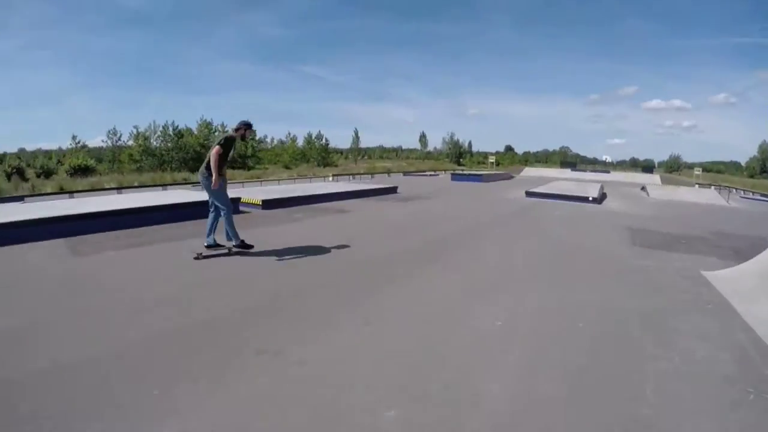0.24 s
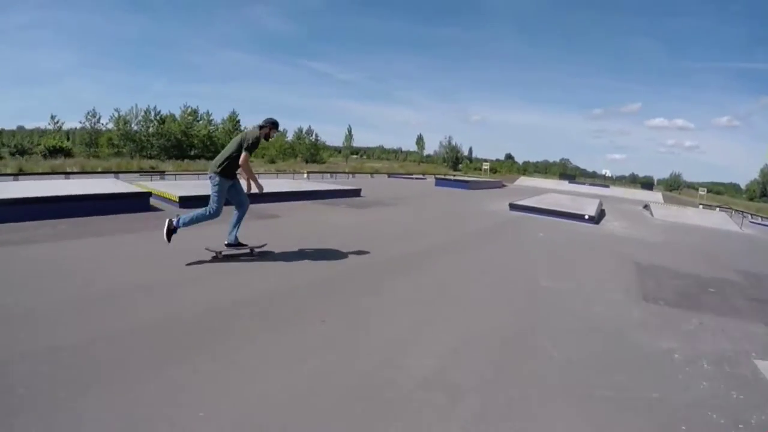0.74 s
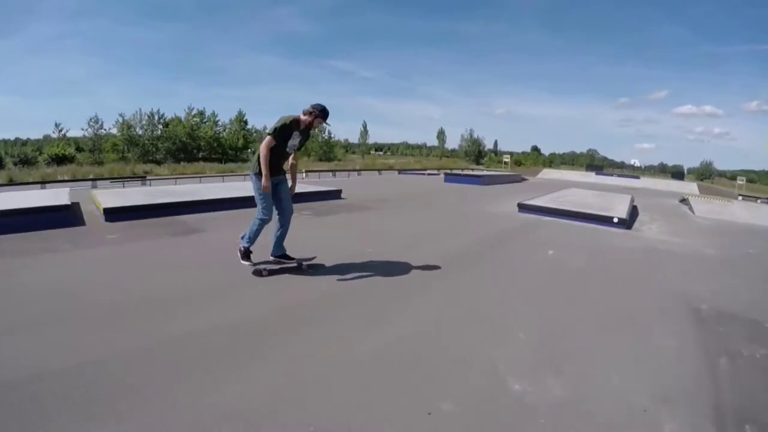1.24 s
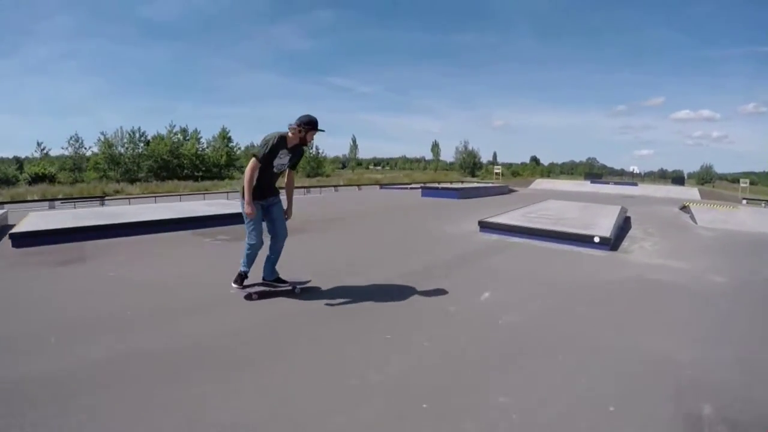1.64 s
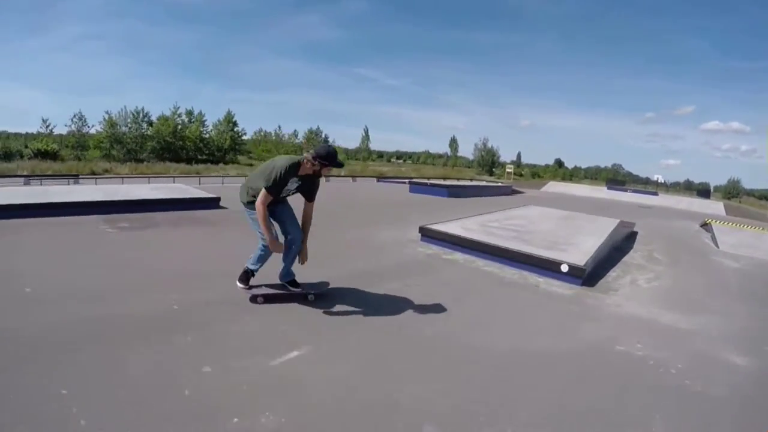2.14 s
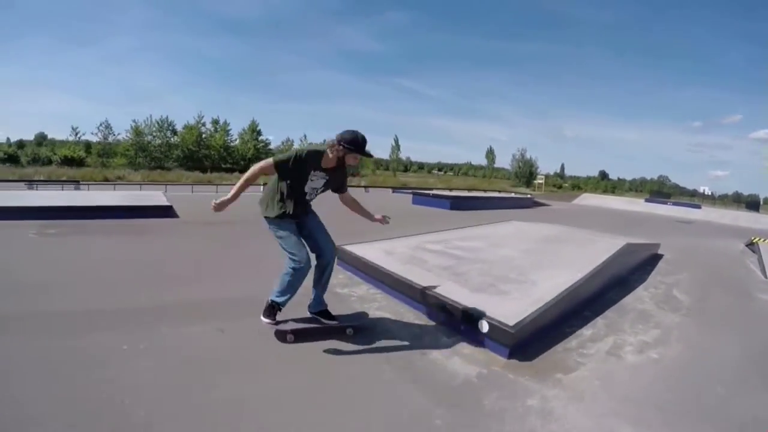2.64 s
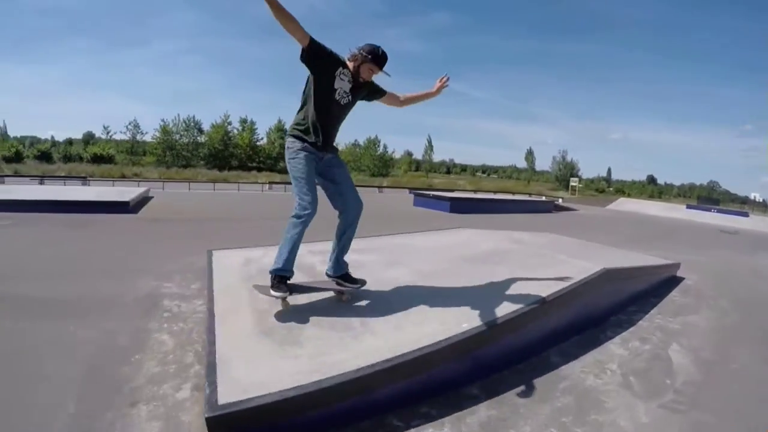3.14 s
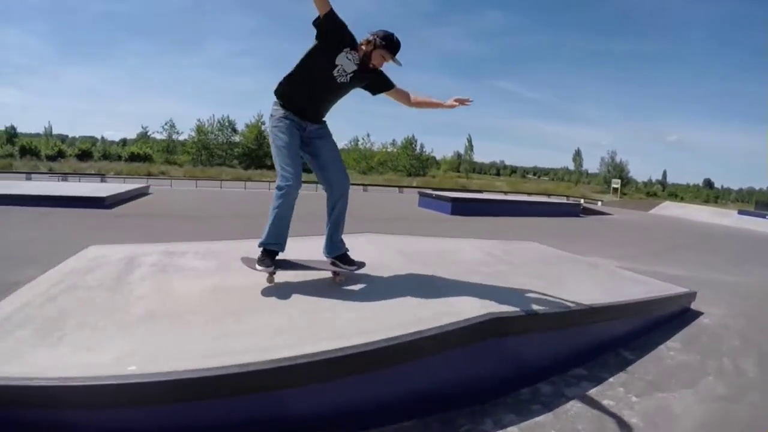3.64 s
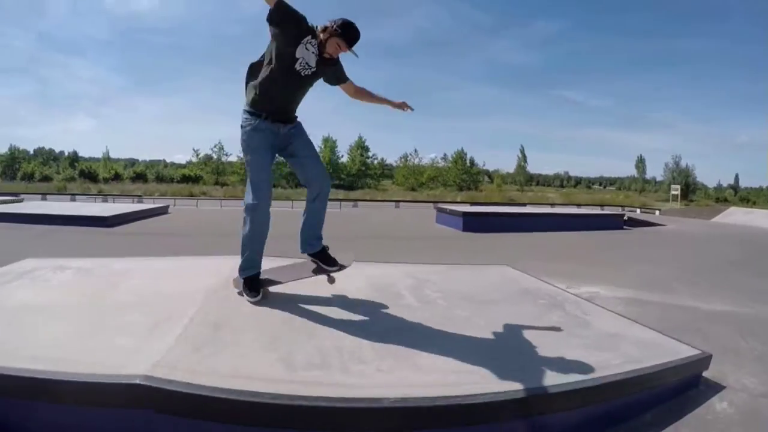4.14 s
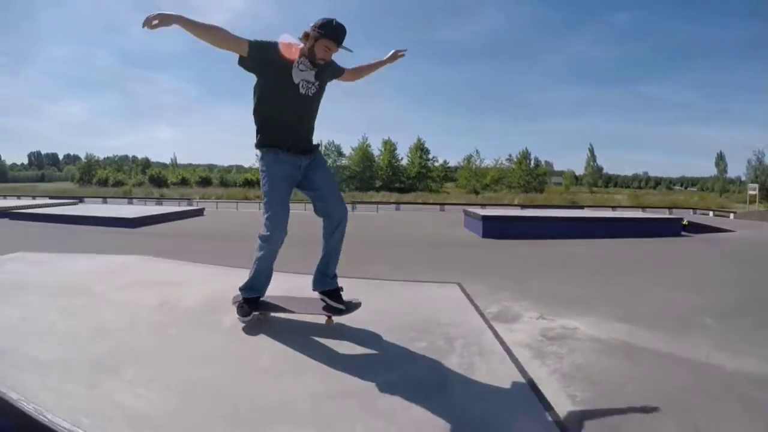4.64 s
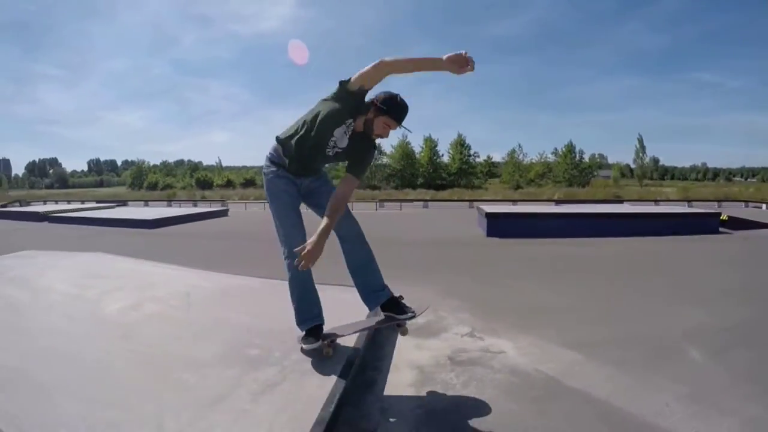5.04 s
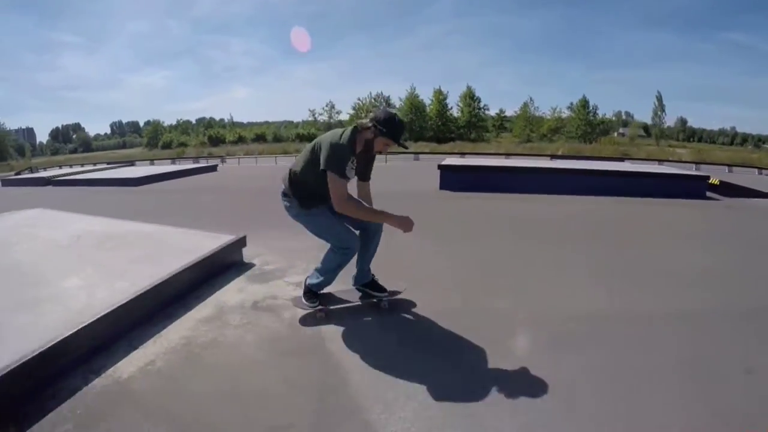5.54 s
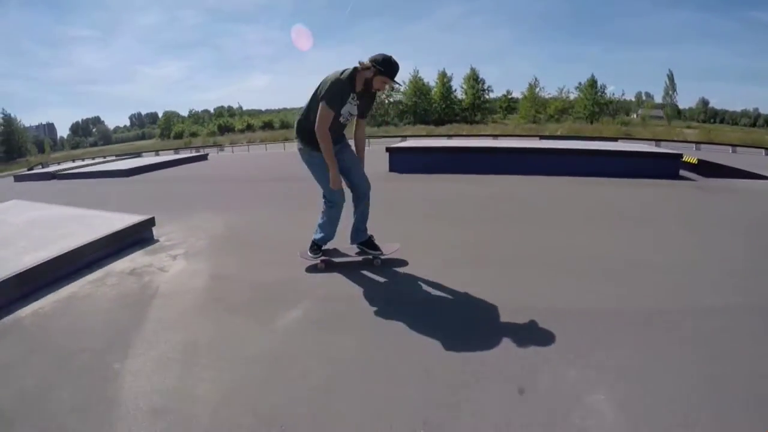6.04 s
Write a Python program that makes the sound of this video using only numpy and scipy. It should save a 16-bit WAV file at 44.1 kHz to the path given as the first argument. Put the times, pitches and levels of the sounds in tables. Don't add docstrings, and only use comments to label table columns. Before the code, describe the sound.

Outdoors in a concrete skatepark, a microphone inside a hard plastic shell catches a rolling skateboard. Irregular hard knocks, chatter and scrapes crowd close over low rumble, wind flutter and faint wheel grind. Dull thuds come through the mount. A quick, bouncing wooden slap marks the drop from a low platform, then the rattle thins out and a smooth rubbing wash closes.

```python
import sys
import numpy as np
from scipy import signal
from scipy.fft import rfft, irfft
from scipy.io import wavfile

SR = 44100
rng = np.random.default_rng(int(sys.argv[2]) if len(sys.argv) > 2 else 0)


def amplitude_ratio(level_db):
    exponent = np.asarray(level_db, float) / 20
    return 10 ** exponent


def pcm_store(signal):
    levels = np.round(np.clip(np.atleast_2d(signal), -1, 1) * 32767)
    wavfile.write(sys.argv[1], SR, levels.astype(np.int16).T)


N = 277830


def noise():
    return rng.standard_normal(N)


def rms_one(x):
    return x / np.sqrt(np.mean(x ** 2) + 1e-20)


def colour(x, spectrum):
    hz = np.linspace(1, SR / 2, 4097)
    table = np.array(spectrum)
    level_db = np.interp(np.log(hz), np.log(table[:, 0]), table[:, 1])
    cepstrum = irfft(np.log(amplitude_ratio(level_db)))
    cepstrum[1:4096] *= 2
    cepstrum[4097:] = 0
    response = irfft(np.exp(rfft(cepstrum)))
    return signal.fftconvolve(x, response / np.linalg.norm(response))[:N]


def drift(rate):
    r = np.exp(-2 * np.pi * rate / SR)
    slow = signal.lfilter([1], [1, -2 * r, r * r], rng.standard_normal(N + SR))
    return rms_one(slow[SR:])


def ring(force, hz, t60):
    r = amplitude_ratio(-60 / (t60 * SR))
    w = 2 * np.pi * hz / SR
    return signal.lfilter([0, np.sin(w)], [1, -2 * r * np.cos(w), r * r], force + 1e-18)


def bursts(times, strengths, shapes):
    out = np.zeros(N + shapes.shape[1])
    for s, strength, shape in zip(times, strengths, shapes):
        at = round(s * SR)
        out[at:at + len(shape)] += strength * shape
    return out[:N]


def swells(starts, lengths, gains, edge):
    out = np.zeros((gains.shape[1], N + SR))
    for s, length, gain in zip(starts, lengths, gains):
        at = round(s * SR)
        swell = signal.windows.tukey(round(length * SR), edge)
        out[:, at:at + len(swell)] += np.outer(gain, swell)
    return out[:, :N]


def in_time(rows):
    s, *columns = np.transpose(rows)
    return [np.interp(np.arange(N) / SR, s, c) for c in columns]


# (frequency [Hz], level [dB per Hz])
WIND = [(15, -6), (28, 6.5), (60, -1), (100, -10.5), (160, -36), (300, -61), (2000, -65)]


def wind(gust_db):
    return amplitude_ratio(gust_db - 0.74 + 3.2 * drift(7.5)) * colour(noise(), WIND)


# (frequency [Hz], level [dB per Hz])
RUMBLE = [(40, -20.5), (80, 4.5), (150, 2.5), (250, -8), (400, -20), (600, -24), (1000, -72.5)]


def rumble(gust_db, rough):
    level_db = -23 + 0.57 * gust_db + 2.0 * drift(11.7) + 1.8 * rough
    return amplitude_ratio(level_db) * colour(noise(), RUMBLE)


# (frequency [Hz], level [dB per Hz])
WHEELS = [(450, -48), (600, -12), (790, 2), (1190, 1.5), (1760, 5), (2910, -3.5), (3340, -12),
          (4500, -28.5)]


def wheel_noise(wheels_db, rough):
    level_db = wheels_db - 7.5 + 1.95 * rough + 2.3 * drift(130)
    return amplitude_ratio(level_db) * colour(noise(), WHEELS)


# (frequency [Hz], level [dB per Hz])
BEARINGS = [(3000, -11.5), (3600, 2.5), (4200, -4.5), (4600, -4.5), (5100, -17), (6500, -31)]


def bearing_rush(bearings_db, rough):
    level_db = bearings_db - 7.0 + 0.94 * rough + 1.5 * drift(9.0)
    return amplitude_ratio(level_db) * colour(noise(), BEARINGS)


# (frequency [Hz], level [dB per Hz])
HISS = [(3500, -2), (5000, 9), (6400, 11), (8300, -2), (10000, 2), (12500, -1), (15000, -10), (16400, -22)]


def wheel_hiss(hiss_db, rough):
    level_db = hiss_db + 0.74 * rough + 0.64 * drift(2.1)
    return amplitude_ratio(level_db) * colour(noise(), HISS)


# (time [s], level [dB])
GUSTS = [(0.0, -29.5), (0.07, -28.5), (0.35, -38), (0.49, -31), (0.77, -36.5), (2.68, -35), (2.86, -32.5),
         (2.96, -40), (3.75, -30), (4.0, -32), (4.9, -31.5), (5.39, -35), (5.44, -28.5), (5.63, -34.5),
         (5.77, -33.5), (5.96, -29.5), (6.19, -46), (6.3, -30)]
# (time [s], wheel noise [dB], bearing rush [dB], hiss [dB])
RIDE = [(0.0, -39.5, -43, -57), (.3, -43, -51, -76), (1.05, -43, -52, -75), (1.5, -44.5, -50, -76),
        (2.05, -47.5, -54.5, -80), (2.7, -45, -50.5, -72), (3.05, -49, -53.5, -78), (3.4, -43, -57, -76),
        (3.7, -49.5, -50, -76), (4.1, -44, -50.5, -81), (4.45, -45.5, -53.5, -76), (4.85, -44.5, -49, -70),
        (5.2, -47.5, -54, -74), (5.5, -44.5, -48, -66), (6.0, -47.5, -55.5, -76), (6.3, -51, -56.5, -76)]


def rolling():
    [gust_db] = in_time(GUSTS)
    wheels_db, bearings_db, hiss_db = in_time(RIDE)
    rough = drift(37)
    ground = rumble(gust_db, rough) + wheel_noise(wheels_db, rough)
    return wind(gust_db) + ground + bearing_rush(bearings_db, rough) + wheel_hiss(hiss_db, rough)


# (start [s], length [s], level [dB], centre [Hz], width [Hz])
WHINES = [
    (1.42, 0.17, -72, 6000, 900),
    (1.44, .2, -60, 4100, 900),
    (4.68, .25, -60, 4000, 800),
    (2.62, .3, -72, 8000, 1200),
    (4.3, .12, -80, 6990, 502),
    (4.619, 0.29, -67, 5480, 700),
    (4.72, 0.2, -68, 8200, 1798),
    (5.02, 0.25, -72.5, 7800, 1800),
    (5.4, 0.24, -72, 8000, 1800),
]


def whines():
    out = np.zeros(N)
    for s, length, db, hz, width in WHINES:
        band = signal.butter(2, [hz - width / 2, hz + width / 2], "band", fs=SR, output="sos")
        song = rms_one(signal.sosfilt(band, noise()))
        out += swells([s], [length], amplitude_ratio([[db]]), edge=0.7)[0] * song
    return out * amplitude_ratio(2.5 * drift(25))


SAND_S = [1.616, 3.841, 3.861, 4.229, 4.241, 4.33, 4.343, 4.387, 4.465, 4.482, 4.52, 4.535, 4.76, 5.01,
          5.049, 5.43, 5.448, 5.463, 5.6, 5.612, 5.745, 5.79]
# (frequency [Hz], level [dB per Hz])
SAND = [(4000, -30), (6500, 0), (12000, 2), (15500, -4), (16500, -30)]


def sand():
    clear_db, stray_db, strays_per_s = -60, -70, 29
    stray_s = rng.uniform(0, N / SR, round(strays_per_s * N / SR))
    s = np.concatenate([SAND_S, stray_s])
    level_db = np.where(np.arange(len(s)) < len(SAND_S), clear_db, stray_db)
    level_db = level_db + 3 * rng.standard_normal(len(s))
    t = np.arange(200) / SR
    grains = rng.standard_normal((len(s), len(t))) * np.exp(-t / 0.0012)
    return colour(bursts(s, amplitude_ratio(level_db), grains), SAND)


def cable_tug():
    recovery = np.exp(-np.arange(800)[None] / SR / 0.003)
    return bursts([4.0992], [-amplitude_ratio(-31)], recovery)


# (time [s], peak level [dB], pitch [Hz])
THUDS = [(0.725, -26, 177), (0.908, -32.5, 184), (1.486, -32, 122), (1.717, -29, 167), (2.437, -29, 119),
         (2.919, -26, 144), (3.066, -32.5, 272), (3.727, -25, 160), (5.327, -28.5, 226.8),
         (4.131, -31.5, 204), (6.051, -30.5, 177), (.146, -36.5, 297), (1.493, -36, 330),
         (1.845, -44.5, 377), (3.275, -38.5, 335), (3.487, -42, 330), (3.734, -38.5, 330),
         (5.701, -36, 330), (6.056, -36, 380)]


def thuds():
    t60 = 0.061
    soft_push = signal.windows.hann(50)[None] / 25
    out = np.zeros(N)
    for s, db, hz in THUDS:
        for ratio, more_db in [(1, 4), (1.65, -12.5)]:
            out += ring(bursts([s], [amplitude_ratio(db + more_db)], soft_push), hz * ratio, t60 / ratio)
    return out


# (start [s], length [s], level [dB])
WASHES = [
    (0, 0.036, -34.5),
    (0.246, 0.033, -46.5),
    (0.347, 0.2, -59),
    (0.724, 0.062, -45.5),
    (0.8, 0.124, -53),
    (4.163, .013, -47),
    (5.932, 0.022, -50),
    (6.212, 1, -48),
]
# (frequency [Hz], level [dB per Hz])
WASH = [(3000, 0), (3700, 4.5), (4500, -5), (5200, -5), (8600, -9.5), (9800, -16.5), (12400, -10),
        (15400, -20), (16400, -45)]


def palm():
    s, length, level_db = np.transpose(WASHES)
    return swells(s, length, amplitude_ratio(level_db)[:, None], edge=0.077)[0] * colour(noise(), WASH)


# (time [s], blow level [dB])
LANDING = [
    (5.3212, -23),
    (5.3243, -26),
    (5.328, -16.5),
    (5.333, -30),
    (5.3366, -17.5),
    (5.339, -24),
    (5.342, -30),
    (5.346, -35),
]
# (pitch [Hz], level [dB], time to fall 60 dB [s])
DECK = [(330, -21, 0.022), (467, -22, .025), (1190, -1.5, 0.029), (1300, -7.5, 0.024), (2600, -16, 0.0092),
        (3950, -5, .008)]


def landing():
    s, blow_db = np.transpose(LANDING)
    luck = rng.standard_normal((len(s), len(DECK)))
    click = np.ones((len(s), 1))
    out = np.zeros(N)
    for k, (hz, db, t60) in enumerate(DECK):
        out += ring(bursts(s, amplitude_ratio(blow_db + db + 3 * luck[:, k]), click), hz, t60)
    return out


# (start [s], length [s], level [dB], centre [Hz])
CHATTER = [(0.0, 0.047, -34, 1620), (0.473, 0.058, -36.5, 2170), (0.557, 0.029, -37.5, 1910),
           (0.637, 0.077, -50.5, 1890), (0.912, 0.027, -36.5, 1740), (0.988, 0.026, -35.5, 1800),
           (1.055, 0.039, -37, 1700), (1.404, 0.032, -33, 1670), (1.342, .045, -50, 1300),
           (1.848, .04, -54, 1100), (1.627, 0.059, -43, 1990), (1.724, 0.045, -37.5, 2100),
           (1.897, 0.083, -45.5, 1930), (1.969, 0.089, -50, 2190), (2.292, 0.08, -47.5, 1520),
           (2.402, 0.055, -39, 1680), (2.525, 0.054, -46, 1780), (2.63, 0.092, -48, 2070),
           (3.011, 0.048, -45.5, 1580), (3.175, 0.035, -34, 1800), (3.307, 0.033, -33.5, 1780),
           (3.38, 0.055, -46.5, 1870), (3.438, 0.08, -41, 1960), (3.564, 0.036, -46, 1850),
           (3.694, 0.12, -50.5, 1790), (3.846, 0.1038, -44, 1680), (4.39, 0.036, -49.5, 1940),
           (4.448, 0.029, -44.5, 1670), (0.16, 0.1, -61, 1520), (0.247, 0.028, -52.5, 2110),
           (4.57, 0.056, -60, 1680), (5.07, .03, -53, 1430), (5.146, .055, -60, 1307),
           (5.568, .04, -62, 1600), (0.398, .05, -57, 1300), (5.749, 0.086, -59, 1700),
           (5.898, 0.085, -49, 1530), (6.218, 0.18, -57.5, 2190)]
# (start [s], length [s], level [dB], scratch [dB], centre [Hz])
SCRAPES = [(0.114, 0.061, -38.5, -19, 1680), (0.315, .12, -46, -9.5, 1450), (0.712, 0.1, -54.5, -2, 1780),
           (0.86, 0.093, -60.5, 6, 2060), (1.277, 0.055, -47.5, -13, 1247), (1.484, .1, -45, -21, 2080),
           (2.132, 0.034, -45.5, -8, 1830), (2.482, 0.04, -40, -17, 1630), (2.85, 0.094, -48.5, -8, 2020),
           (3.055, 0.048, -50, 1.5, 1940), (3.229, 0.071, -45, -14, 1870),
           (4.089, 0.13, -46.5, -11.5, 2170), (4.719, 0.057, -46.5, -16, 2150),
           (4.824, 0.096, -49.5, -9.5, 1970), (4.91, 0.17, -54.5, -7, 1780),
           (5.277, 0.017, -41.5, -3, 1700), (5.317, 0.037, -45, 9.5, 1400), (4.164, .013, -43.5, 3, 2000),
           (4.19, .01, -50, 0, 2200), (0.038, 0.034, -53.5, -4, 1800), (4.988, 0.036, -47, -21, 1240),
           (5.303, 0.013, -47, -15, 2010), (5.495, 0.062, -65, 9, 2010), (5.976, 0.11, -52.5, -9, 1590)]
# (pitch [Hz], level [dB], time to fall 60 dB [s])
SHELL = [(898, 18.5, 0.014), (1103, -23, 0.043), (1280, -25.5, 0.03), (1453, -12.5, 0.016),
         (1680, 0, 0.012), (1780, -3, 0.019), (1870, -15.5, 0.055), (2170, 4.5, 0.013), (2484, -8, 0.022),
         (2828, -6.5, 0.014), (2960, -28, 0.015), (3603, -7, 0.015), (3870, -28.5, 0.013),
         (4120, -46, 0.0011)]
# (frequency [Hz], level [dB])
WALL = [(200, -18), (560, -15.5), (760, 0.5), (4200, 6.5), (5200, -6.5), (6200, 3.5), (7500, -9.5),
        (15000, -8)]
# (frequency [Hz], level [dB per Hz])
SCRATCH = [(3500, 12.5), (4300, 10.5), (5200, -2), (6500, -1), (7200, -1), (8000, -5), (9100, -6.5),
           (14800, -34)]


def rubs():
    ticks_per_s, edge = 1700, 0.49
    hz, mode_db, t60 = np.transpose(SHELL)
    dull = [(s, length, db, -23, centre) for s, length, db, centre in CHATTER]
    s, length, level_db, scratch_db, centre_hz = np.transpose(dull + list(SCRAPES))
    octaves_away = np.log2(hz / centre_hz[:, None])
    share = amplitude_ratio(0.8 * mode_db - 22.5 * octaves_away ** 2)
    share /= np.linalg.norm(share, axis=1)[:, None]
    body = swells(s, length, share * amplitude_ratio(level_db - 9)[:, None], edge)
    scratch = swells(s, length, amplitude_ratio(level_db + scratch_db + 5.5)[:, None], edge)[0]
    sizes = amplitude_ratio(3.5 * np.minimum(rng.exponential(1, N), 3))
    ticks = rms_one(sizes * (rng.random(N) < ticks_per_s / SR))
    rung = np.zeros(N)
    for force, f, t in zip(body, hz, t60):
        wander = amplitude_ratio(4.5 * drift(18.3))
        rung += ring(force * wander * ticks * noise(), f, t * 0.64)
    rung = signal.sosfilt(signal.butter(4, 4300, fs=SR, output="sos"), rung)
    return colour(rung, WALL) + scratch * amplitude_ratio(3 * drift(200)) * colour(noise(), SCRATCH)


# (time [s], blow level [dB], centre [Hz])
PANEL = [(.0349, -33, 1910), (.4712, -12, 2190), (.5743, -9, 2020), (.6038, -15.5, 2040),
         (.9416, -12, 1870), (1.0622, -13.5, 2300), (1.1758, -10, 1800), (1.5141, -13.5, 2270),
         (1.6468, -8, 2090), (1.741, -4.5, 2040), (2.298, -12.5, 2000), (2.3341, -6, 2170),
         (2.6527, -11, 2210), (3.1794, -12, 2330), (3.3938, -6.5, 1920), (3.6836, -17.5, 1654),
         (3.81, -7.5, 1870), (4.6381, -5.5, 1920), (5.285, -10, 1750), (5.5195, -14.5, 1870)]
# (time [s], blow level [dB], centre [Hz])
FLANK = [(.137, -12, 2170), (.1465, -3, 2330), (.4642, -11.5, 1900), (.648, -3.5, 2470), (.6675, -14, 1980),
         (.6779, -5.5, 2100), (1.7206, -2.5, 2020), (1.737, -9, 2070), (2.0844, -3.5, 2000),
         (2.167, -11.5, 2120), (2.4082, -12.5, 2130), (2.6625, -14.5, 1870), (2.8948, -7.5, 2320),
         (2.902, -8, 2170), (2.9524, -12, 1900), (3.1856, -13, 2450), (3.3149, -7.5, 2170),
         (3.321, -10, 2060), (3.337, -18, 2040), (3.6115, -10, 2220), (3.9036, -6.5, 1760),
         (3.9105, -19.5, 1929), (4.1058, -7, 2380), (4.1094, -10, 2380), (4.1348, -7.5, 2170),
         (4.2575, -11, 1870), (4.6929, -8, 2064), (5.0349, -18, 1682), (5.3651, -1.5, 2010),
         (5.7004, 0.5, 2120)]
# (time [s], blow level [dB], centre [Hz])
RIM = [(.1521, -7.5, 2030), (.5076, -9.5, 2200), (.5633, -24, 2250), (.9197, -11.5, 1710),
       (1.0, -12.5, 2060), (1.0075, -22, 1920), (1.4461, -17.5, 1780), (1.686, -12, 1870),
       (1.8446, -5, 2070), (2.1496, -10.5, 2070), (2.4384, -3, 2030), (2.818, -13.5, 2170),
       (3.2735, -3.5, 1970), (3.3836, -12.5, 2010), (3.4084, -11, 1870), (3.4267, -6, 2300),
       (3.6338, -13, 2210), (3.7662, -12.5, 1880), (4.0622, -18.5, 2280), (5.547, -17.5, 1820)]
# (time [s], blow level [dB], centre [Hz])
CORNER = [(.5009, -2.5, 2210), (.7153, -3.5, 1980), (.91, -8, 2460), (1.428, -18, 1800),
          (1.4929, -1.5, 2030), (2.1627, -8.5, 2000), (2.1831, -3.5, 2179), (2.2634, -6, 2480),
          (2.5304, -18, 1960), (2.545, -6, 2170), (2.8472, -1.5, 2220), (2.9201, -2, 2170),
          (3.3429, -8, 2290), (3.437, -18, 2100), (3.7334, -2, 2220), (3.7553, -5, 2040),
          (4.3088, -16, 1630), (4.4308, -10, 1810), (5.2968, -11.5, 1970)]
# (time [s], blow level [dB], lowest mode [dB], crack [dB], centre [Hz])
SNAPS = [(0.1409, -7.5, 0, -14, 2300), (1.487, -12.5, -13, -16, 2200), (1.9714, -13.5, 13, -11.5, 2040),
         (2.642, -4.5, -28, -16.5, 2300), (3.073, -12.5, 9, -9.5, 2240), (3.4868, -8, 8.5, -17, 2070),
         (3.6294, -8.5, -15, -15, 1960), (4.1251, -6.5, 9, -19, 2170), (4.1548, -13, 4, -17, 2170),
         (4.213, -3.5, -1, -17, 2070), (4.9224, -7, 5, -14, 2060), (5.322, -22, -7, 4, 1810),
         (5.333, -18, -17, 2, 1560), (6.0556, 1.5, 7, -18, 2300)]
# (time [s], blow level [dB])
TAPS = [(.3837, -19.5), (.6225, -19), (.7847, -21), (.8234, -20), (.8818, -22), (.886, -21.5), (.9945, -29),
        (1.781, -19.5), (1.893, -22.5), (2.232, -23.5), (2.2571, -21), (2.6371, -16.5), (2.8833, -20),
        (2.9999, -17), (3.0658, -18), (3.3053, -22), (3.568, -23), (3.7184, -16.5), (3.781, -18),
        (3.9246, -16), (3.9862, -19.5), (4.0492, -18), (4.9396, -23), (5.2186, -17.5), (5.4997, -22),
        (5.935, -22), (6.0478, -25)]
LIGHT_S = [0.1153, 1.1006, 1.349, 1.3671, 2.0706, 2.5375, 2.6175, 3.011, 3.2443, 3.368, 3.457, 3.8928,
           3.935, 4.2275, 4.4243, 4.458, 4.634, 4.7336, 4.9675, 5.691, 5.9398, 5.9716, 6.006]
FAINT_S = [0.35, 0.41, 0.74, 1.0454, 1.08, 0.83, 1.33, 1.7, 1.78, 1.8, 1.7, 1.925, 2.0286, 3, 3.866, 3.8,
           3.8, 4.04, 4.1, 4.362, 5.34, 4.9126, 5.6, 4.6, 6, 6.3, 3.843, 2.868, 4.8, 5.59, 6.028, 6.0435]
MIDDLE_HZ = 2070


def contacts():
    places = [(PANEL, 6), (FLANK, 1), (RIM, -17), (CORNER, -34)]
    blows = []
    for table, low_db in places:
        for s, db, hz in table:
            crack_db = -18.5 + 0.52 * db + 3 * np.log2(hz / MIDDLE_HZ)
            blows.append((s, db, low_db, crack_db, hz))
    light = [(s, -27) for s in LIGHT_S]
    faint = [(s, -30.5) for s in FAINT_S]
    taps = sorted(list(TAPS) + light + faint)
    return sorted(blows + list(SNAPS)) + [(s, db, 5, -36, MIDDLE_HZ) for s, db in taps]


# (time [s], pitch [Hz])
LEADS = [(0.142, 1746), (0.153, 1580), (0.503, 2165), (0.576, 2195), (0.65, 1740), (0.68, 1750),
         (0.717, 1683), (0.912, 1620), (1.001, 1780), (1.177, 1660), (1.494, 1700), (1.648, 1800),
         (1.721, 1790), (1.744, 1770), (1.846, 2200), (2.084, 1520), (2.151, 1710), (2.164, 1800),
         (2.184, 1700), (2.264, 1680), (2.335, 1783), (2.438, 1770), (2.546, 1740), (2.643, 1716),
         (2.848, 1860), (2.896, 2020), (2.922, 1705), (2.954, 1780), (3.185, 1700), (3.276, 1483),
         (3.317, 1580), (3.345, 1530), (3.385, 1730), (3.395, 1564), (3.41, 1740), (3.428, 1730),
         (3.488, 1780), (3.612, 1740), (3.63, 2130), (3.735, 1700), (3.756, 1689), (3.767, 1730),
         (3.811, 1560), (3.905, 1724), (4.107, 2240), (4.126, 1850), (4.138, 1800), (4.214, 1760),
         (4.259, 1750), (4.432, 1680), (4.64, 1543), (4.694, 1730), (4.924, 1790), (5.367, 1730),
         (5.702, 1780), (6.057, 1780)]


def leading(s, hz):
    lead_s, lead_hz = np.transpose(LEADS)
    last_knock = np.argmin(np.diff(s))
    knock = np.searchsorted(s[:last_knock + 1], lead_s) - 1
    mode = np.argmin(np.abs(hz[knock] - lead_hz[:, None]), axis=1)
    marks = np.zeros(hz.shape)
    marks[knock, mode] = lead_hz
    return np.where(marks > 0, marks, hz), marks > 0


# (frequency [Hz], level [dB per Hz])
CRACK = [(3500, -65), (4800, 14.5), (6400, 5), (7500, -25), (10000, -1), (15000, -12.5), (16500, -18)]


def knocks():
    s, blow_db, low_db, crack_db, centre_hz = np.transpose(contacts())
    shell_hz, level_db, shell_t60 = np.transpose(SHELL)
    luck, shift, grip = rng.standard_normal((3, len(s), len(SHELL)))
    hz = shell_hz * np.exp(0.02 * shift)
    t60 = shell_t60 * amplitude_ratio(2 * grip)
    hz, leads = leading(s, hz)

    t = np.arange(400) / SR
    contact, grit = rng.standard_normal((2, len(s), len(t)))
    contact = contact * np.exp(-t / 0.0017) * (1 - np.exp(-t / 0.00041))

    tilt = np.log2(centre_hz / MIDDLE_HZ)[:, None] * np.log2(hz / MIDDLE_HZ)
    share = amplitude_ratio(level_db + 67.5 * tilt + 4.5 * luck)
    second_strongest = np.sort(share[:, 1:])[:, [-2]]
    share = np.where(leads, amplitude_ratio(7.5) * second_strongest, share)
    share /= np.linalg.norm(share[:, 1:], axis=1)[:, None]
    share[:, 0] = amplitude_ratio(low_db - 11.5)

    waves = np.exp(2j * np.pi * hz[..., None] * t)
    drive = np.abs(np.sum(contact[:, None] * waves, axis=2))
    drive = np.hypot(drive, 0.6 * np.linalg.norm(contact, axis=1)[:, None])
    strength = amplitude_ratio(blow_db - 5.5)[:, None] * share / drive

    later = np.arange(2000) / SR
    modes = np.zeros((len(s), len(later)))
    for k in range(len(SHELL)):
        decay = np.exp(-np.log(1000) * later / t60[:, [k]])
        modes += strength[:, [k]] * decay * np.sin(2 * np.pi * hz[:, [k]] * later)
    body = bursts(s, np.ones(len(s)), signal.fftconvolve(modes, contact, axes=1))
    grit = grit * np.exp(-t / 0.0018) * (1 - np.exp(-t / 0.0011))
    crack = bursts(s, amplitude_ratio(blow_db + crack_db - 4.5), grit)
    return colour(body, WALL) + colour(crack, CRACK)


def scene():
    ride = rolling() + whines() + sand() + cable_tug()
    bumps = thuds() + palm() + landing()
    return (ride + bumps + rubs() + knocks())[None]


def low_pass(x):
    return signal.sosfilt(signal.butter(12, 16000, fs=SR, output="sos"), x)


def record(dry):
    ceiling, cutoff_hz = 0.48, 15400
    flat = dry / (1 + np.abs(dry / ceiling) ** 8) ** (1 / 8)
    mix = signal.sosfilt(signal.butter(6, cutoff_hz, fs=SR, output="sos"), flat)
    return low_pass(mix)


dry = scene()
out = record(dry)
pcm_store(out)
```